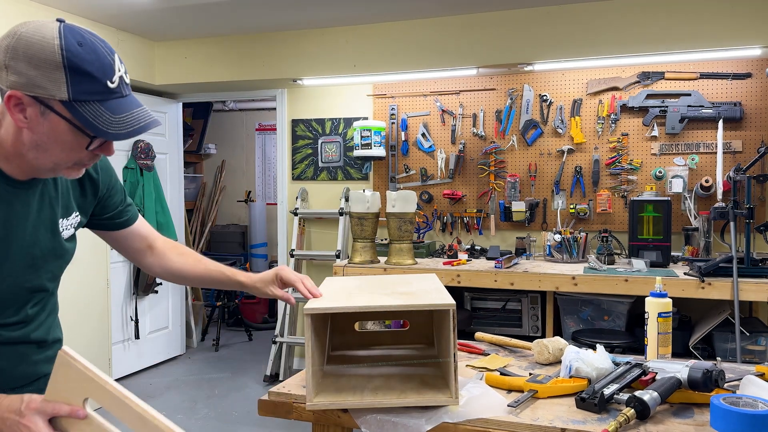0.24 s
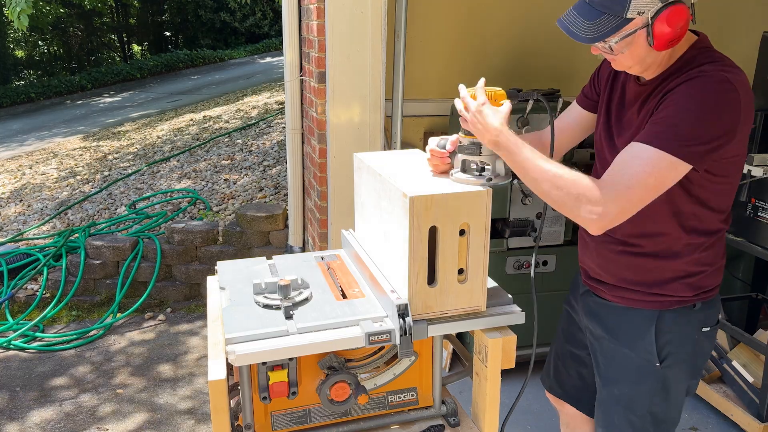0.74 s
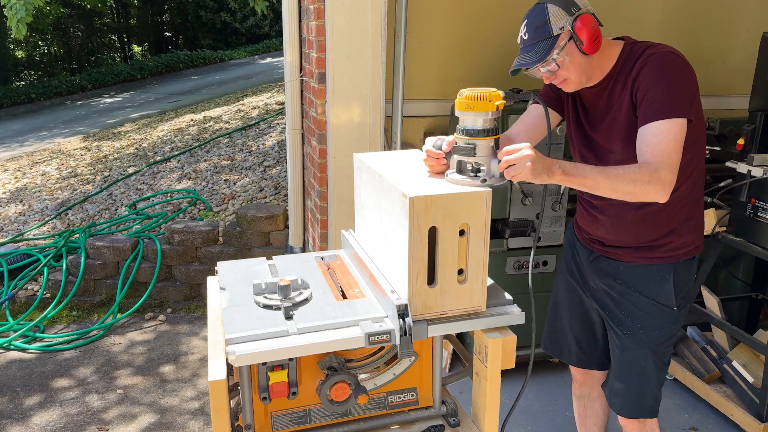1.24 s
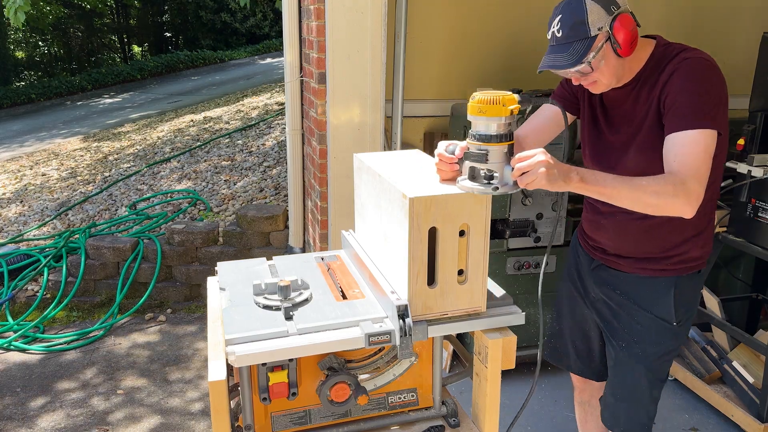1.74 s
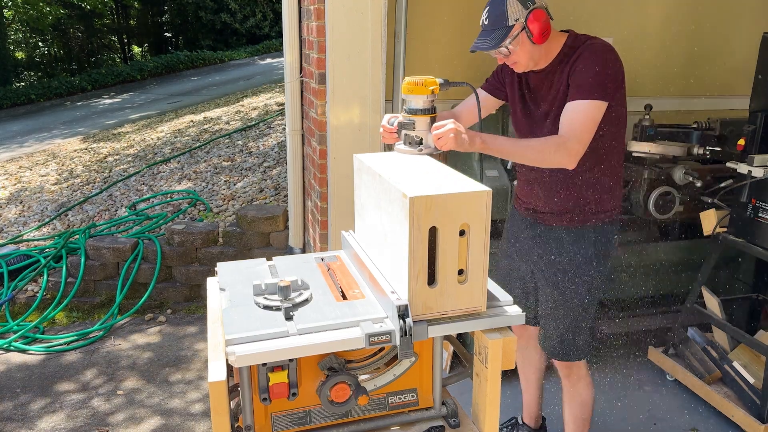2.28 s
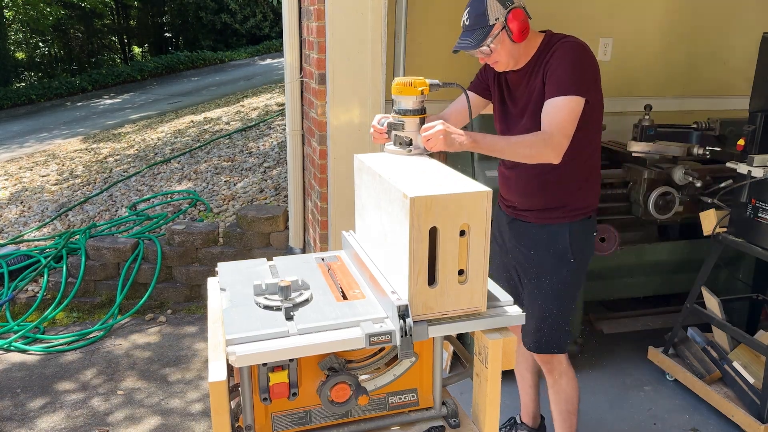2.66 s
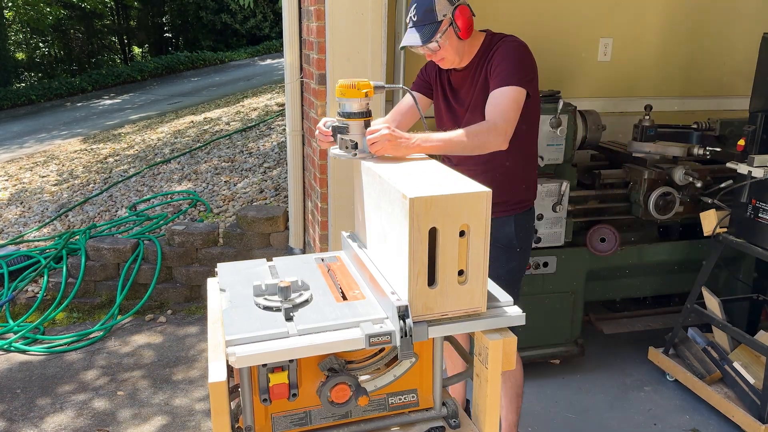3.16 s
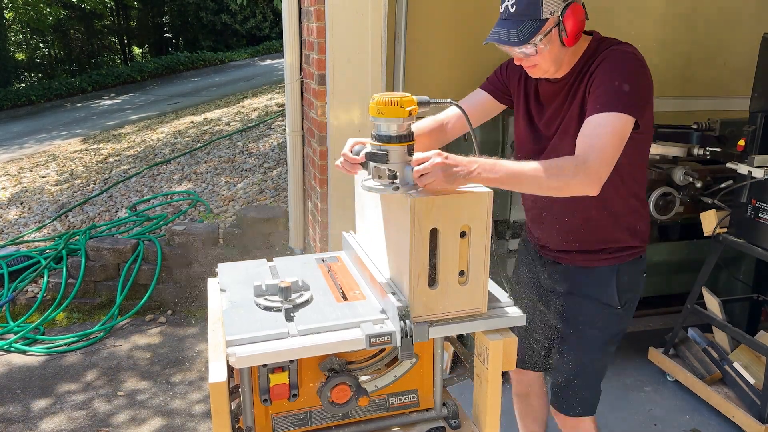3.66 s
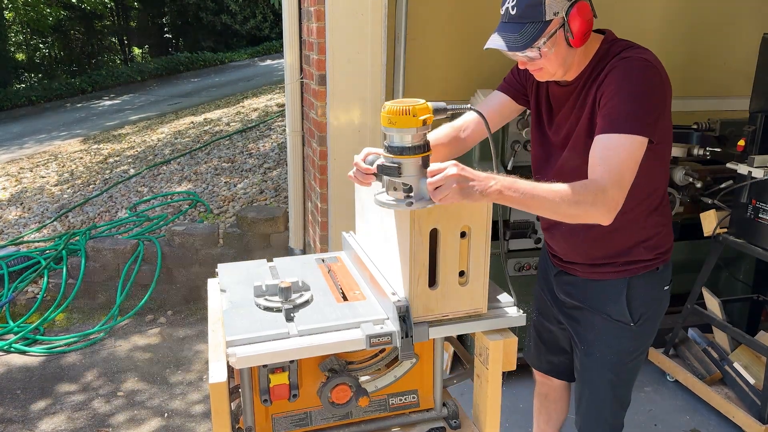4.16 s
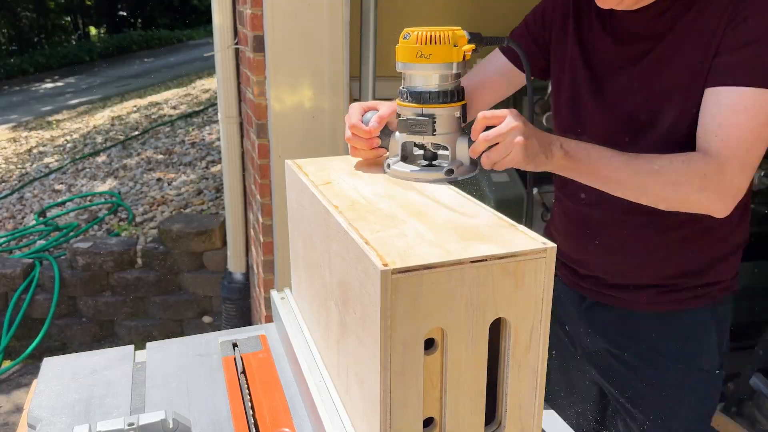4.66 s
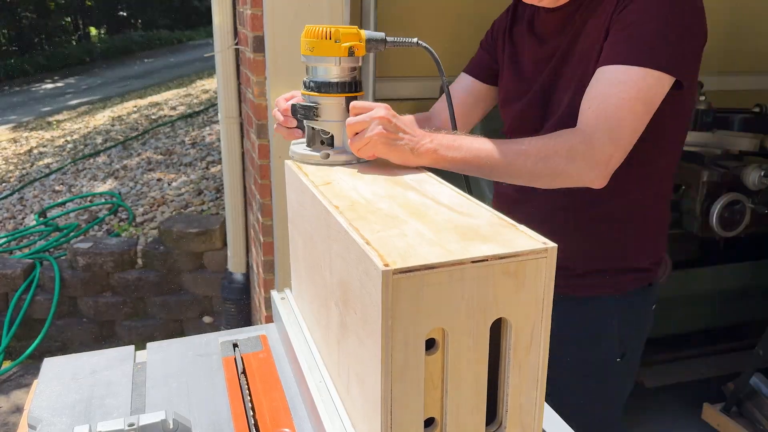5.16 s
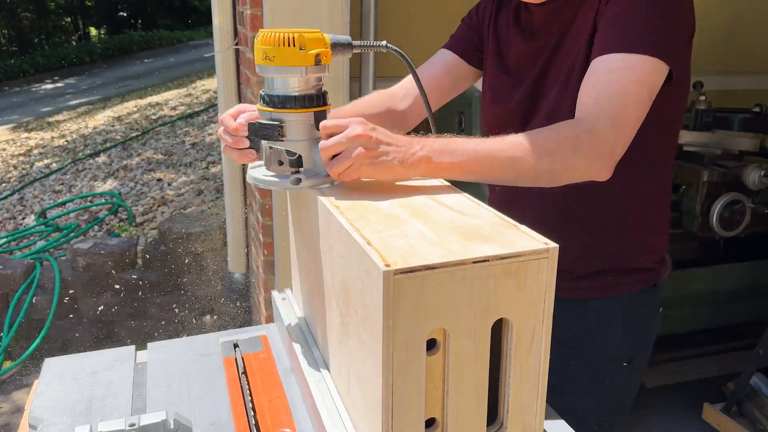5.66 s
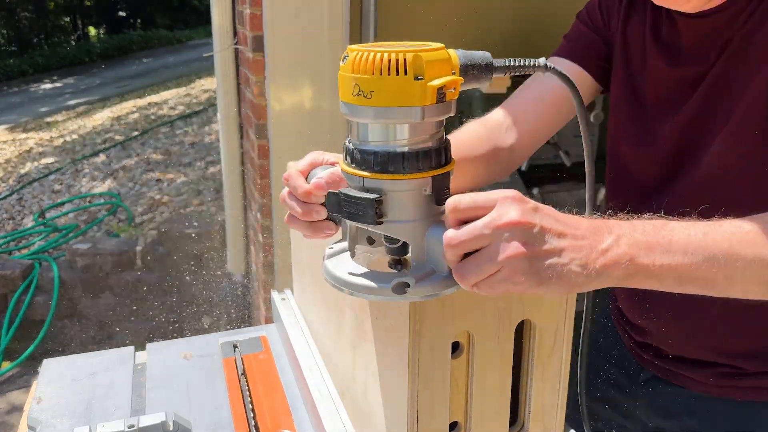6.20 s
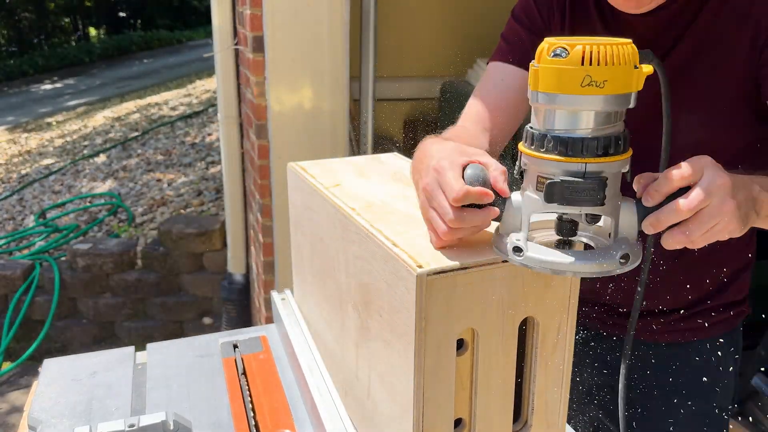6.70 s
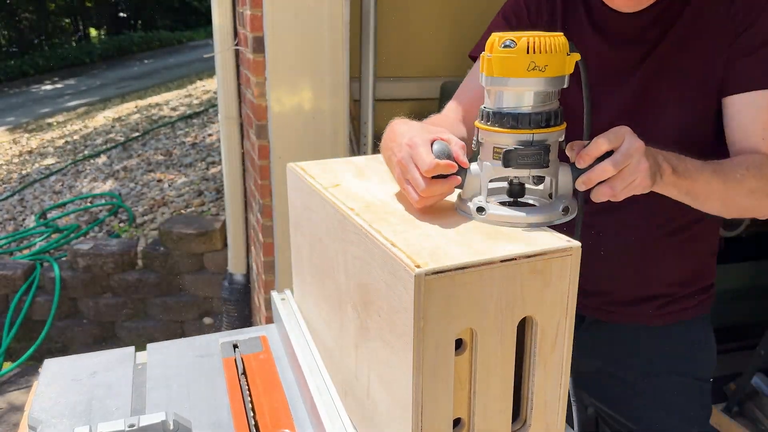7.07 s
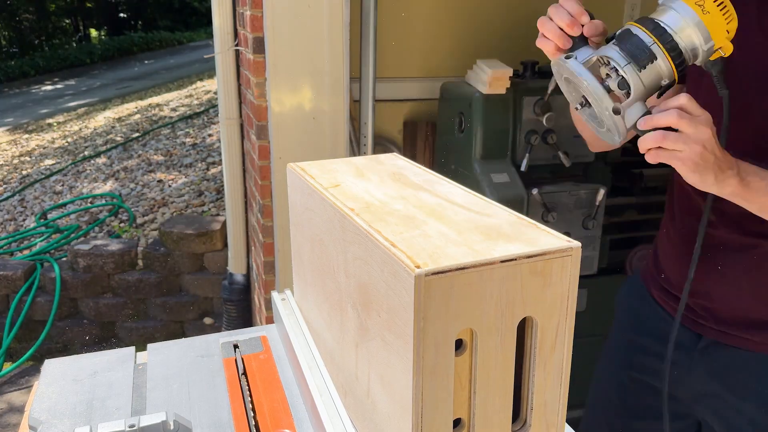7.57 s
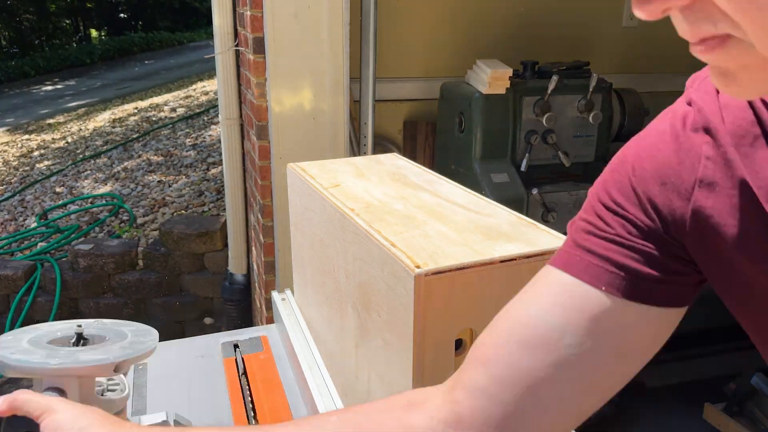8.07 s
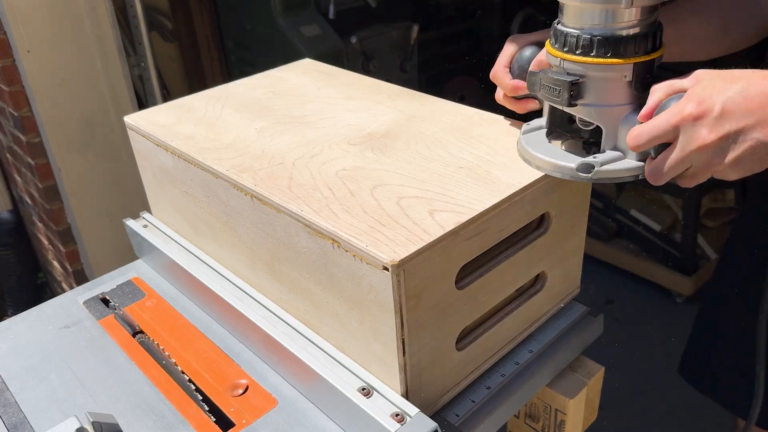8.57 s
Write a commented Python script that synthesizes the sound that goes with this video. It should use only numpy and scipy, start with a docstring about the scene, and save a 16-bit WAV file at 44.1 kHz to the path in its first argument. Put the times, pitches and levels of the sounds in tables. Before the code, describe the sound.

After a moment of quiet workshop tone, faint outdoor traffic and leaves come in, and a small router snaps up to a high whine. It trims a plywood box with a bright hiss of air and chips, its tone swelling and fading as it moves. Near the end it briefly winds down, then returns abruptly at full speed, its base knocking lightly on the wood. The tool sounds fairly close and centred.

```python
"""A garage doorway: after a moment of quiet workshop, a small router trims a plywood box in three passes.
Time runs many times too fast, so the shaft whines above 3 kHz, fan and chips hiss in the treble and
wind puffs shrink to taps. Unbalance, flutes and bearing sound at multiples of the shaft speed; the
motor spins up twice and runs down once. The base plate knocks on the box; traffic and leaves lie behind."""
import sys
import numpy as np
from scipy import signal
from scipy.fft import rfft, irfft, next_fast_len
from scipy.io import wavfile
from scipy.ndimage import map_coordinates

SR = 44100
rng = np.random.default_rng(int(sys.argv[2]) if len(sys.argv) > 2 else 0)


def dump(signal):
    """Clip the signal to [-1, 1] and save it as 16-bit WAV at the path in sys.argv[1]."""
    limited = np.clip(np.atleast_2d(signal).T, -1, 1)
    pcm = np.round(limited * 32767).astype(np.int16)
    wavfile.write(sys.argv[1], SR, pcm)


N = 389844
TIME = np.arange(N) / SR
SIDES = np.array([[1], [-1]])   # left, right
SWITCH_OFF_S = 7.78


def whine():
    """Forced vibration: unbalance and flutes drive harmonics (orders) of the shaft's rotation."""
    # passes: start t/s, end t/s, half speed reached t/s, fade-in/s
    passes = [(.935, 4.36, .952, .018), (4.3, 8.0, 4.318, .012), (8.13, 8.84, 8.0, .055)]
    # load on the bit, one list a pass: t/s, share of full load
    loads = [
        [(1.0, 0), (1.1, .3), (1.6, .92), (2.2, 1)],
        [(4.46, -.06), (4.54, .12), (4.58, .46), (4.66, .02), (4.7, .18), (4.76, .94), (5.3, 1)],
        [(8.1, 1), (8.84, 1)],
    ]
    # orders 1-4: loss/dB per octave below full speed
    slow_loss_db = [11.6, 49, 60, 80]
    # unsteady part of orders 1-4 while the bit bites: level/dB
    sputter_db = [-64, -71, -59, -52.5]
    levels, slip = order_modulation()
    before_off = during(0, SWITCH_OFF_S, .1)
    out = 0
    for (start, end, half_s, fade_s), load in zip(passes, loads):
        shaft_hz = shaft_speed(half_s, load)
        turns = np.cumsum(shaft_hz * (1 + .0008 * drift(30))) / SR
        octaves = np.log2(np.minimum(shaft_hz / 3300, 1))   # negative below full speed
        order_db = [db + loss_db * octaves for db, loss_db in zip(levels, slow_loss_db)]
        order_db[0] += 21 * resonance(shaft_hz, centre_hz=1880, width_hz=100) * before_off   # housing
        tones = sum(from_db(db) * wavering(k * (turns + slip), 1.24, .22)
                    for k, db in enumerate(order_db, 1))
        biting = during(start + .22, min(end, 7.62) if half_s < SWITCH_OFF_S else end, .039)
        tones += biting * sum(from_db(db) * sputter(k * turns, 31) for k, db in enumerate(sputter_db, 1))
        tones += bearing(shaft_hz, turns, octaves, before_off)
        tones += chatter(turns)
        out += tones * during(start, 9, fade_s) ** 2 * during(0, end, .018)
    return out


def shaft_speed(half_s, load, idle_hz=3373, sag_hz=50, spin_up_s=.009, run_down_s=.3):
    """Torque balance: S-shaped spin-up, sag under load and exponential run-down, in turns per second."""
    governed = idle_hz - sag_hz * in_time(load)[0] - .95 * (TIME - 1)   # slows as it warms
    coasting = np.exp(-np.maximum(TIME - SWITCH_OFF_S, 0) / run_down_s) if half_s < SWITCH_OFF_S else 1
    return governed * coasting / (1 + np.exp(-np.clip((TIME - half_s) / spin_up_s, -2, 50)))


def order_modulation():
    """Amplitude and phase modulation: the orders swell and fade as the tool turns and travels."""
    # shaft orders 1 to 4, one table each: t/s, level/dB
    first = [(1.0, -51), (2.2, -54), (2.32, -47), (2.48, -62.5), (2.56, -50.5), (3.24, -50), (3.32, -63.5),
             (3.5, -59), (3.66, -42.5), (3.84, -60.5), (4.14, -49), (4.25, -62.5), (4.31, -51),
             (4.5, -48.5), (4.94, -55), (5.0, -78), (5.12, -47), (5.38, -59.5), (5.64, -51.5), (7.0, -38),
             (7.14, -48.5), (7.45, -50), (7.54, -44), (7.6, -69), (7.84, -58.5), (7.98, -74), (8.15, -46),
             (8.43, -53.5), (8.46, -43), (8.52, -59), (8.545, -44), (8.588, -39.5), (8.598, -52),
             (8.76, -46.5), (8.84, -54)]
    second = [(1.0, -46.5), (1.2, -46), (1.32, -41.5), (1.6, -44.5), (1.65, -54), (1.75, -44),
              (2.14, -44.5), (2.36, -46), (2.4, -55), (3.18, -49), (3.26, -55), (3.96, -52), (4.04, -63),
              (4.36, -50), (4.5, -41.5), (5.46, -61), (5.78, -43.5), (5.82, -57.5), (6.2, -48.5),
              (6.26, -46.5), (7.34, -49), (7.46, -44.5), (7.7, -63), (8.0, -80), (8.15, -43.5), (8.6, -44),
              (8.76, -38.5), (8.84, -44)]
    third = [(1.0, -67), (1.32, -60), (1.52, -45.5), (2.18, -55), (2.54, -69), (2.68, -47), (2.94, -69),
             (2.96, -47.5), (3.98, -58), (4.1, -46), (4.28, -55), (4.6, -42), (5.16, -53), (5.46, -45),
             (5.52, -62), (5.74, -46), (6.02, -58), (6.06, -45), (7.2, -57), (8.62, -57), (8.74, -39.5),
             (8.82, -41)]
    fourth = [(1.0, -65.5), (1.3, -59), (1.58, -42.5), (1.68, -51), (1.78, -39.5), (1.96, -58), (2.04, -40),
              (2.58, -59), (2.68, -38.5), (2.9, -68), (2.96, -43), (3.76, -44), (3.84, -58), (4.18, -41.5),
              (4.32, -58), (4.44, -43.5), (5.02, -41), (5.22, -56), (5.44, -38.5), (5.76, -44), (5.82, -58),
              (6.38, -40), (6.44, -27.5), (6.5, -44), (6.72, -37), (6.93, -48), (7.01, -34), (7.07, -49),
              (7.45, -49), (7.75, -59), (8.2, -55), (8.7, -37)]
    # the first order dips and the phase of all orders slips: t/s, length/s
    dips = [(2.632, .012), (2.8, .018), (2.925, .012), (3.355, .02), (4.655, .035), (5.26, .04),
            (3.77, .03), (3.98, .028), (5.635, .02), (5.9, .02), (6.35, .047), (6.885, .05), (7.048, .018),
            (7.115, .02), (7.27, .035), (7.325, .025), (7.488, .042)]
    levels = [in_time(rows)[0] for rows in (first, second, third, fourth)]
    levels[0] -= 15 * sum(during(s, s + length, .004) for s, length in dips)
    lifted = during(7.55, 8.14, .03)   # off the wood
    levels = [db + fading_db * drift(7.5) - lift_loss_db * lifted
              for db, fading_db, lift_loss_db in zip(levels, (1.34, 2.8, 3.6, 3.1), (0, 8, 14, 6))]
    slip_turns = sum(rng.uniform(-1, 1) * .6 * during(s, 9, length) for s, length in dips)
    return levels, slip_turns


def bearing(shaft_hz, shaft_turns, octaves, before_off, order=4.153):
    """Rolling contact sounds a non-integer order and a lower sideband; the shell resonates to it."""
    # bearing tone: t/s, level/dB
    levels = [(1.0, -52), (1.32, -59), (1.58, -47.5), (2.94, -47.5), (3.3, -58), (3.46, -51.5),
              (4.76, -49.5), (5.0, -43), (5.14, -50), (5.88, -45), (6.75, -49.5), (7.3, -53), (7.7, -52),
              (8.2, -54), (8.84, -55)]
    turns = np.cumsum(order * shaft_hz + 7 * drift(8) - 8 * (TIME - 4)) / SR   # slips as it warms
    tone = wavering(turns, 1.8, .61)
    sideband = from_db(-13.5 + 5 * drift(1.2)) * wavering(turns - shaft_turns, 1.6, .49)
    shell_db = 12 * resonance(order * shaft_hz, centre_hz=11700, width_hz=1070) * before_off
    slowing_db = octaves * (12 + 60 * (1 - before_off))
    return from_db(in_time(levels)[0] + shell_db + 2.5 * drift(5) + slowing_db) * (tone + sideband)


def chatter(turns):
    """Period doubling: the bit bites every second turn, sounding orders 1/2 and 3/2."""
    # chatter as the cut begins: t/s, level/dB
    levels = [(.965, -67), (.975, -50), (1.16, -49), (1.18, -67)]
    level_db, = in_time([(0, -130)] + levels + [(1.2, -130)])
    tones = wavering(turns / 2, .49, .02) + from_db(-14) * wavering(3 * turns / 2, 2, .02)
    return from_db(level_db) * tones


def fan_and_chips(crossover_hz=11500):
    """Broadband noise: the fan and chips hiss, and the cut rasps in a lower band."""
    # air and cut: t/s, hiss level/dB, rasp level/dB, hiss gain above the crossover/dB
    levels = [(.9, -72, -84, -17), (.94, -46, -53, -6), (.98, -34, -49, -5), (1.14, -38, -52.5, -1),
              (2.05, -39.5, -54.5, -2.5), (2.37, -42, -57, -2.5), (3.2, -40, -53.5, -3),
              (4.3, -38.5, -53, -3.5), (4.37, -28, -42.5, -2.5), (4.86, -38, -54, -5.5),
              (5.55, -36, -52, 0), (6.39, -32, -48, -12), (7.12, -35.5, -49, -1), (7.48, -34, -49.5, -9.5),
              (7.82, -39, -53.5, -.5), (7.92, -52, -58, 9), (8.01, -47, -62.5, 5), (8.13, -60, -73, -10),
              (8.15, -40, -50, -1), (8.19, -30.5, -47, -5), (8.84, -29, -43.5, -3.5)]
    # spectra of hiss and rasp: f/Hz, relative density/dB
    hiss_spectrum = [(2940, -79), (5000, -34), (5990, -8), (6350, -7), (6440, -6), (9050, -4.5),
                     (10300, -5.5), (12700, -3), (13500, -2), (16000, -3.5)]
    rasp_spectrum = [(900, -39), (1500, -15), (2600, -9.5), (3600, -6), (4600, -4.5), (5600, 2),
                     (6500, -1.5), (9000, -33.5)]
    hiss_db, rasp_db, treble_db = in_time(levels)
    treble = from_db(treble_db) * butterworth(coloured_noise(hiss_spectrum), crossover_hz, "high")
    hiss = butterworth(coloured_noise(hiss_spectrum), crossover_hz, "low") + treble
    hiss *= from_db(hiss_db + .68 * drift(22))
    rasp = from_db(rasp_db + .97 * drift(17) + 1.4 * drift(2.5)) * coloured_noise(rasp_spectrum)
    return (hiss + rasp) * during(.91, 9, .02)


def with_reflections(direct):
    """Comb filtering: reflections interfere with the direct sound, shifting as the tool travels."""
    # moving reflections: t/s, near delay/ms, near gain/dB, far delay/ms
    paths = [(1.0, .29, -15, .98), (2.0, .29, -11, 1.0), (2.3, .29, -11, .63), (3.1, .31, -11, .64),
             (3.5, .28, -12, .6), (4.4, .29, -12, .58), (5.0, .25, -12, .45), (5.45, .26, -10, .58),
             (5.8, .275, -9, .56), (6.2, .3, -11, .55), (6.35, .31, -12, .62), (7.05, .3, -12, .6),
             (7.25, .27, -11, .58), (7.75, .29, -11, .7), (8.05, .45, -11, 1.15), (8.15, .28, -17, .88)]
    # wall reflections: delay/ms
    wall_ms = [.93, 1.28, 1.52, 2.1]
    near_ms, near_db, far_ms = in_time(paths)
    moving = from_db(near_db) * delayed(direct, near_ms) + from_db(-13) * delayed(direct, far_ms)
    walls = sum(delayed(direct, ms * (1 + .05 * drift(.8)), order=1) for ms in wall_ms)
    return direct + moving + from_db(-18) * walls


def faint_tones():
    """Random modulation: thin tones waver in pitch and level, coming and going beside the whine."""
    # tones: start t/s, end t/s, f/Hz, level/dB
    tones = [(1.1, 2.2, 2121, -69), (4.4, 4.9, 2150, -70), (6.95, 7.55, 2118, -72), (1.0, 2.35, 2400, -72),
             (4.45, 4.9, 2410, -66), (5.1, 7.6, 2400, -77), (1.0, 4.3, 4520, -73), (8.2, 8.4, 640, -67)]
    return sum(from_db(db) * during(start, end, .013)
               * wavering(np.cumsum(hz + 8 * drift(17.8)) / SR, 3.5, .02) for start, end, hz, db in tones)


def knocks():
    """Modal ringing: the base plate strikes the box; harder knocks favour the upper modes."""
    # impacts: t/s, level/dB, spectral tilt/dB per octave
    impacts = [(5.2396, -26, 4), (7.405, -33.5, 3), (8.0222, -36.5, 3), (8.156, -27, 13.5),
               (8.1675, -22.5, 6), (8.2387, -32, 0.5), (8.3921, -28.5, 1)]
    # modes of the plywood box: f/Hz, level/dB, T60/s
    modes = [(700, -5, .02), (1500, -5, .012), (1950, -2, .014), (2450, 0, .014), (2950, -3, .012),
             (3650, -4, .01), (4300, -3, .01), (5300, -8, .007), (6100, -11, .005)]
    s, impact_db, tilt_db = np.transpose(impacts)
    spread_db = rng.normal(0, 2.5, (len(s), len(modes)))
    out = np.zeros(N)
    for k, (hz, mode_db, t60) in enumerate(modes):
        strike_db = impact_db + mode_db - 11 + tilt_db * np.log2(hz / 2500) + spread_db[:, k]
        clicks = np.zeros(N)
        clicks[np.round(s * SR).astype(int)] = from_db(strike_db)
        out += ring(clicks, hz, t60) * (-1) ** k
    return butterworth(out, 500, "high")


def wind_puffs():
    """Pressure pulses: each puff swells and dies in a cycle or two, its phase unequal at the ears."""
    # distinct puffs: t/s, level/dB, f/Hz
    distinct = [(0.608, -43.5, 705), (0.734, -44, 694), (0.8, -44, 907), (0.81, -39.5, 633),
                (1.134, -41, 756), (1.156, -44, 980), (1.299, -43, 659), (1.384, -36.5, 665),
                (1.609, -39, 940), (1.712, -44, 624), (1.746, -44, 600), (1.809, -45, 1030),
                (1.822, -37, 856), (1.843, -42, 830), (1.974, -40.5, 990), (2.81, -44, 958),
                (2.822, -34, 735), (2.831, -36, 619), (2.843, -39.5, 550), (2.86, -36.5, 762),
                (2.871, -45, 748), (3.408, -47, 520), (3.536, -52, 482), (5.634, -44, 705),
                (6.363, -36.5, 810), (6.428, -47, 525), (7.559, -46.5, 619), (7.685, -41, 920),
                (7.851, -46, 506), (7.932, -44.5, 570), (7.972, -40.5, 633), (8.092, -44, 650),
                (8.109, -36.5, 794)]
    faint = rng.uniform([.55, -61, 430], [8.7, -53, 900], (14, 3))
    puffs = np.vstack([distinct, faint])
    out, t = np.zeros((2, N)), np.arange(-200, 400) / SR
    for (s, db, hz), (phase, lean) in zip(puffs, rng.uniform(-.69, 1, (len(puffs), 2))):
        envelope = np.exp(-np.abs(t - .001) * hz / np.where(t < .001, .5, 1))
        angle = 2 * np.pi * hz * t + np.pi * phase + .62 * lean * SIDES
        wave = np.sin(angle) + .21 * np.sin(.65 * angle) + .7 * envelope * np.sin(1.83 * angle)
        at = round(s * SR)
        out[:, at - 200:at + 400] += from_db(db) * envelope * wave
    return out


def street():
    """Superposition: lumpy traffic noise and rustling leaves add to a hum and a faint whistle."""
    # traffic: t/s, level/dB
    levels = [(.5, -63), (.73, -58.5), (1.13, -60.5), (1.68, -62.5), (2.54, -68.5), (2.85, -61.5),
              (2.96, -66), (4.29, -68.5), (4.33, -65.5), (6.54, -64.5), (7.05, -70.5), (8.07, -61),
              (8.84, -66.5)]
    # spectra of traffic and leaves: f/Hz, relative density/dB
    traffic_spectrum = [(120, -48), (230, -18), (330, -12), (480, 2.5), (700, 5), (1100, 2.5), (1500, -7),
                        (2500, -34)]
    leaf_spectrum = [(900, -19.5), (1500, 2.5), (4000, -1), (9000, -6.5), (16000, -17)]
    traffic_db, = in_time(levels)
    traffic = from_db(traffic_db + 1.8 * drift(35)) * coloured_noise(traffic_spectrum)
    leaves = from_db(-66.5) * coloured_noise(leaf_spectrum)
    return (traffic + leaves + hum(traffic_db) + whistle()) * during(.513, 9, .0045)


def hum(traffic_db, hz=979):
    """Electrical hum: one modulated tone whose level follows that of the traffic."""
    level_db = -69.5 + 1.2 * (traffic_db + 64.5) + 2.15 * drift(3.3)
    return from_db(level_db) * wavering(np.cumsum(hz + 6.5 * drift(14.6)) / SR, 3.2, .3)


def whistle():
    """Frequency glide: two faint narrow bands fall and rise together."""
    # glide: t/s, upper band f/Hz, level/dB
    glide = [(.54, 8800, -95), (.56, 8700, -78), (.65, 8250, -76), (.8, 7100, -76), (.83, 7300, -80),
             (.92, 10000, -78), (.93, 10200, -95)]
    hz, level_db = in_time(glide)
    return from_db(level_db) * sum(sputter(np.cumsum(ratio * hz) / SR, 90) for ratio in (1, .85))


def workshop():
    """Ambient noise: room tone with low shuffling, fading as the street comes in."""
    # room tone: t/s, level/dB
    levels = [(0.0, -59.5), (0.094, -69.5), (0.512, -64.5), (0.6, -91)]
    # its spectrum: f/Hz, relative density/dB
    spectrum = [(15, -45), (25, -12), (55, -5), (149, -15), (200, -1.5), (354, -24.5), (394, -19.5),
                (451, -17), (516, -23.5), (5430, -32.5), (12500, -42.5), (14400, -44), (16000, -61)]
    level_db = in_time(levels)[0] - .3 + .81 * drift(6.7)
    return from_db(level_db) * coloured_noise(spectrum) * during(-1, .8, .088)


def coloured_noise(spectrum):
    """Partial coherence: shaped stereo noise of rms 1 that differs a little between the ears."""
    # stereo width: f/Hz, side minus mid level/dB
    width = [(60, -19), (150, -4), (380, -15.5), (900, -22), (1400, -53), (5300, -45.5), (6000, -12),
             (9000, -10), (15000, -8)]
    # phase lead of the left ear: f/Hz, angle/rad
    lead = [(60, 0.2), (4800, -0.13), (6500, -0.32), (15000, -0.69)]
    size = next_fast_len(N)
    hz = np.maximum(np.arange(size // 2 + 1) * SR / size, 1)
    mid, side = rfft(rng.standard_normal((2, size))) * from_db(at_hz(spectrum, hz))
    ears = (mid + from_db(at_hz(width, hz)) * side * SIDES) * np.exp(.5j * at_hz(lead, hz) * SIDES)
    return rms_one(irfft(ears, size)[:, :N])


def wavering(turns, waver_db, apart_rad):
    """Random modulation of a sine's level and of its phase between the ears."""
    slip = apart_rad * drift(5.2) * SIDES
    return np.sqrt(2) * np.sin(2 * np.pi * turns + slip) * from_db(waver_db * drift(40))


def sputter(turns, rate_hz):
    """Narrow-band noise: sine and cosine carriers with independent random amplitudes."""
    return drift(rate_hz) * np.sin(2 * np.pi * turns) + drift(rate_hz) * np.cos(2 * np.pi * turns)


def drift(rate_hz):
    """Slow fluctuation: low-passed noise of rms 1."""
    pole = np.exp(-40 * np.pi * rate_hz / SR)   # runs at SR / 20
    slow = signal.lfilter([1], [1, -2 * pole, pole * pole], rng.standard_normal(N // 20 + 2002))[2000:]
    return np.interp(np.arange(N) / 20, np.arange(len(slow)), rms_one(slow))


def ring(clicks, hz, t60):
    """Damped oscillator: a unit click starts a decaying sine of height 1."""
    r, w = from_db(-60 / (t60 * SR)), 2 * np.pi * hz / SR
    return signal.lfilter([0, np.sin(w)], [1, -2 * r * np.cos(w), r * r], clicks + 1e-18)


def resonance(hz, centre_hz, width_hz):
    """Resonance curve: 1 at the centre, half at width_hz to either side."""
    return 1 / (1 + ((hz - centre_hz) / width_hz) ** 2)


def delayed(x, delay_ms, order=3):
    """Varying path delay; a low interpolation order dulls the sound."""
    positions = np.arange(N) - delay_ms * SR / 1000
    return np.array([map_coordinates(ear, [positions], order=order) for ear in x])


def butterworth(x, hz, kind, order=2):
    """Maximally flat low- or high-pass filter."""
    return signal.sosfilt(signal.butter(order, hz, kind, fs=SR, output="sos"), x)


def from_db(db):
    """Amplitude ratio of a level."""
    return 10 ** (np.asarray(db) / 20)


def rms_one(x):
    """Normalisation to rms 1."""
    return x / np.sqrt(np.mean(x ** 2) + 1e-20)


def in_time(rows):
    """Linear interpolation of a table's columns at every sample."""
    s, *columns = np.transpose(rows)
    return [np.interp(TIME, s, column) for column in columns]


def during(start, end, fade):
    """Time window with linear fades."""
    return np.clip(np.minimum(TIME - start, end - TIME) / fade, 0, 1)


def at_hz(points, hz):
    """Interpolation on a logarithmic frequency axis."""
    known_hz, values = np.transpose(points)
    return np.interp(np.log(hz), np.log(known_hz), values)


def scene():
    """Level difference sways the router as it rounds the box; only the workshop keeps its bass."""
    # router's balance: t/s, left minus right level/dB
    balance = [(.9, 0.5), (2.7, 0.5), (3.3, 0.4), (4.2, -0.4), (5.7, 1.1), (6.7, -0.7), (7.7, -0.2),
               (8.84, -0.8)]
    router = whine() + with_reflections(fan_and_chips()) + faint_tones()
    router *= from_db(in_time(balance)[0] * SIDES / 2)
    outdoors = router + street() + wind_puffs() + knocks()
    return butterworth(outdoors, 235, "high", order=4) + workshop()


def record(dry, cutoff_hz=15750):
    """Band limiting: a steep low-pass removes the highest treble."""
    return signal.sosfilt(signal.ellip(10, .3, 80, cutoff_hz, fs=SR, output="sos"), dry)


dry = scene()
out = record(dry)
dump(out)
```